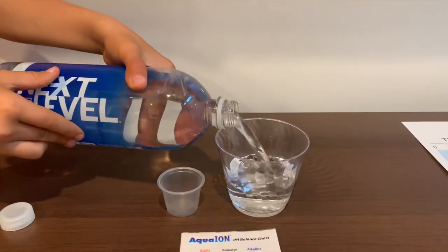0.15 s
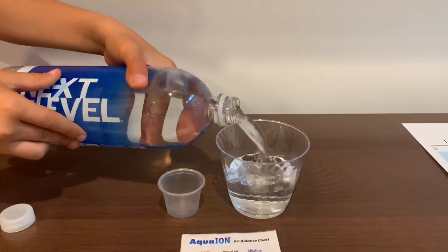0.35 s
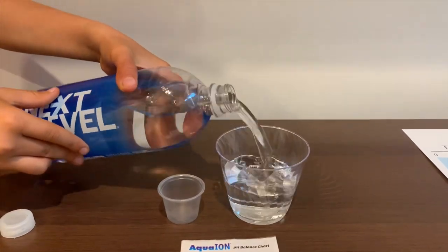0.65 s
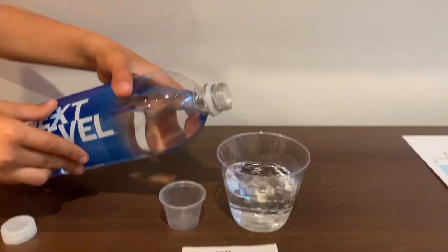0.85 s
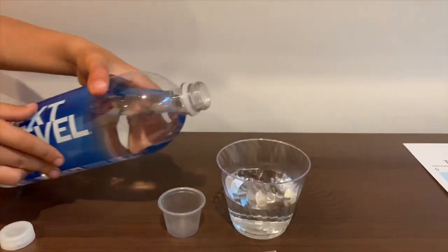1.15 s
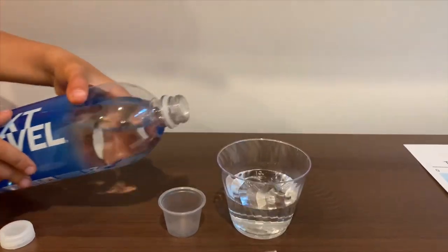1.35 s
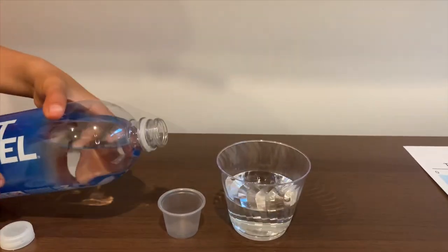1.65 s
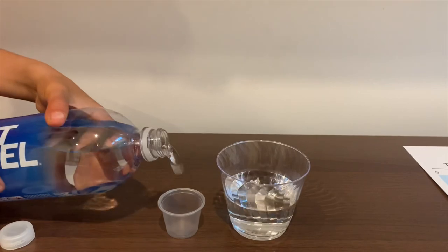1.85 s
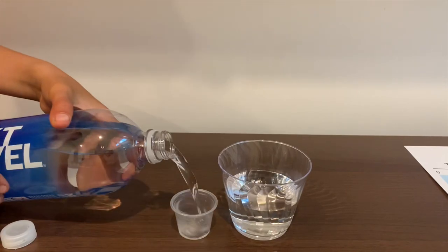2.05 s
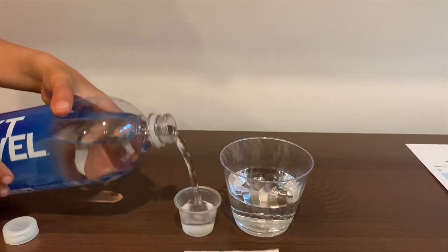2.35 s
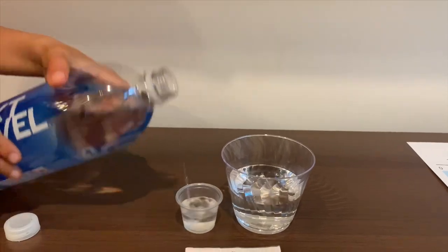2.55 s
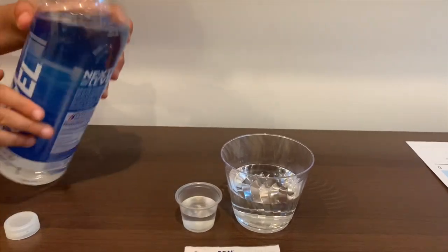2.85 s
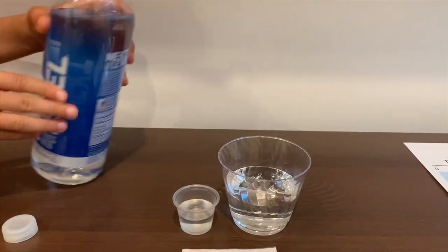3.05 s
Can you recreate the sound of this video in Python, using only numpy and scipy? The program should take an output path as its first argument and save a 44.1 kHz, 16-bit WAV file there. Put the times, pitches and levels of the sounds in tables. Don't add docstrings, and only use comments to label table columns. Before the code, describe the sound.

Water pours from a plastic bottle into plastic cups, bubbling and gulping, then the bottle thuds down

```python
import sys
import numpy as np
from scipy import signal
from scipy.fft import rfft, irfft, next_fast_len
from scipy.io import wavfile
from scipy.ndimage import uniform_filter1d

SR = 44100
rng = np.random.default_rng(int(sys.argv[2]) if len(sys.argv) > 2 else 0)


def master_out(mix):
    frames = np.transpose(np.atleast_2d(mix))
    ceiling = np.clip(frames, -1, 1)
    pcm = np.round(ceiling * 32767).astype(np.int16)
    wavfile.write(sys.argv[1], SR, pcm)


def makeup_ratio(level_db):
    decades = np.asarray(level_db, float) / 20
    return 10 ** decades


N = 141120

# [f/Hz, level/dB]
RUMBLE = [(41, -39), (80, -1.5), (174, -7.5), (216, -4), (588, -18.5), (1500, -35.5), (1950, -101),
          (3300, -120)]
# [f/Hz, level/dB]
HISS = [(1500, -4), (2700, -22.5), (4500, -18), (8800, -20.5), (10500, -22), (12200, -20.5), (14000, -22.5),
        (15300, -25)]
# [f/Hz, likeness 0 to 1]
LIKENESS = [(60, 0.78), (240, 0.78), (950, 0.19), (3770, 0.023), (6200, 0.12), (8500, 0.54), (9800, 0.98),
            (14000, .995)]
# [f/Hz, phase/rad]
LEFT_LEAD = [(1000, 0), (1700, -.9), (3100, 1.6), (5800, 2.8), (6600, .7), (10600, -3.14), (13600, -6.28),
             (16000, -8.6)]
# [f/Hz, level/dB]
LEFT_LEAN = [(250, -0.5), (800, 3.5), (2500, 5), (5000, -6), (9000, 1), (12000, 0.5)]
# [f/Hz, t60/s]
ROOM_DECAY = [(200, 0.38), (1000, 0.41), (3000, 0.44), (9000, 0.083)]
# [f/Hz, width/Hz, level/dB]
HUM_LINES = [(36.6, 6.5, -64.5), (54.7, 4.8, -52), (120.3, 2.9, -65.5), (168.94, 12.4, -48.5),
             (596.5, 15, -70), (861, 30, -77.5)]
# [t/s, knock level/dB, sway level/dB]
BUMPS = [
    (.896, -21.5, -29),
    (.941, -25.5, -34),
    (1.412, -23, -34.5),
    (1.459, -26, -30),
    (3.075, -10.5, -12),
    (3.0925, -20, -38),
    (3.141, -18, -38),
    (3.188, -14, -60),
]
# [f/Hz, level/dB, t60/s]
TABLE_TONES = [(92.6, -0.5, 0.21), (214.3, -0.5, 0.13), (362, 1.5, 0.099), (430, 9.5, 0.024),
               (437.5, -10.5, 0.095), (505.4, -3, 0.082), (650, -6, 0.092), (1010, -21.5, 0.16),
               (1050, -25.5, 0.048)]
# [t/s, peak level/dB, brightness/dB]
CRACKLES = [(0.034, -64.5, -2), (0.083, -69, 3), (0.1002, -59, -1), (0.1436, -60.5, -7), (0.2654, -61, 4),
            (0.3416, -64.5, -7), (1.0301, -67, 13), (1.053, -63, 6), (1.1214, -63, 4), (1.282, -63, 4),
            (1.55, -63.5, 1), (2.1774, -66, -2), (2.461, -70, 8), (2.9652, -62.5, 14), (0.3744, -47.5, 4),
            (0.598, -54, -3), (0.6459, -40, 2.5), (0.6649, -45, 18), (0.686, -39.5, 1.5), (0.8102, -53, 9),
            (0.8827, -47.5, 4.5), (1.0733, -58.5, 5), (1.162, -53.5, 2.5), (1.9955, -47.5, 4.5),
            (2.069, -49, 1.5), (2.2254, -57, 2.5), (2.5488, -43, 4.5), (2.6268, -42, 30),
            (3.0742, -43.5, -2), (3.1974, -46, 7)]
# [f/Hz, level/dB]
CRACKLE_COLOUR = [(2060, -27.5), (3500, -6), (5530, -1.5), (7130, -1.5), (8740, 1.5), (10600, 0),
                  (12500, -6.5), (16000, -4.5)]
# [t/s, peak level/dB, centre f/Hz, ring/s]
GULPS = [(0.178, -41, 760, 0.023), (.202, -30.5, 243, 0.028), (0.206, -28, 1147, 0.0073),
         (.343, -51, 600, .01), (0.3742, -32, 422, 0.036), (0.494, -36.5, 670, 0.11),
         (.65, -42.5, 333, 0.058), (0.687, -37, 344, 0.078), (1.996, -44.5, 650, 0.22),
         (2.551, -40.5, 415, 0.022), (2.603, -34.5, 467, 0.052), (2.623, -41, 920, 0.0091),
         (3.013, -57, 500, 0.022), (2.666, -43.5, 384, 0.18)]
# [f/Hz, width/Hz, level/dB]
BOTTLE_TONES = [(199, 38, 11), (309, 68, 5.5), (403, 35, -3.5), (650, 83, 0.5), (850, 33, -1),
                (1325, 33, -5), (1600, 64, -4), (1930, 59, -8), (2326, 69, -12.5)]
# [t/s, level/dB]
SPRAY_LEVEL = [(0, -74.5), (.15, -80.5), (.2, -89), (.62, -78), (.7, -68), (.9, -90), (1.2, -78.5),
               (1.4, -90), (1.98, -105), (2.0, -71), (2.08, -77), (2.12, -99), (2.22, -91), (2.24, -81),
               (2.3, -117), (2.55, -93), (2.7, -89), (3.2, -91)]
# [t/s, peak level/dB, centre f/Hz, length/s]
SPLASHES = [(1.99, -57.5, 12500, 0.034), (2.243, -67, 9000, 0.014), (2.638, -70, 12900, 0.028),
            (3.185, -55, 5270, 0.0088), (1.996, -61.5, 1490, 0.021), (2.602, -63, 3800, 0.05),
            (0.338, -54, 700, 0.0052), (.0, -61, 2920, 0.053), (0.357, -63, 1530, 0.0068),
            (0.374, -45.5, 1230, 0.011), (0.642, -57.5, 4300, 0.0063), (0.685, -47, 2370, 0.012),
            (0.882, -46.5, 2600, 0.0088), (1.992, -57, 1050, 0.066), (1.993, -46, 5340, 0.0042),
            (2.175, -62.5, 2420, 0.019), (2.234, -59.5, 3150, 0.014), (2.547, -46.5, 1120, 0.0079),
            (2.595, -49.5, 3160, 0.016), (2.599, -58, 1380, 0.013), (3.134, -60.5, 3950, 0.028)]
# [t/s, peak level/dB, f/Hz, cycles]
BUBBLES = [(0.0127, -57, 1930, 19), (0.0528, -55.5, 2190, 20), (0.0845, -47.5, 3560, 36),
           (0.105, -40, 2490, 3.7), (0.1533, -44, 3750, 13), (0.1575, -51, 1810, 7.9),
           (0.2094, -42.5, 1940, 22), (0.3891, -43.5, 3335, 33), (0.39, -42.5, 3720, 12),
           (0.4967, -33.5, 3145, 13.5), (0.496, -39.5, 3390, 5.5), (0.499, -40, 3020, 12),
           (0.499, -37.5, 1420, 3.3), (0.6906, -41.5, 1620, 11), (0.7456, -49, 1640, 31),
           (0.7735, -52, 2350, 13), (0.814, -51, 1900, 13), (0.8474, -36.5, 1910, 6.8),
           (0.862, -47, 1600, 11), (0.8721, -39.5, 2395, 19), (0.8855, -36.5, 1890, 7.8),
           (2.1783, -53, 2770, 8), (2.5157, -62, 3250, 12), (2.522, -59, 3000, 10),
           (2.572, -55.5, 2170, 27), (2.604, -43, 2780, 8)]
# [t/s, peak level/dB, f/Hz]
FIZZ = [(0.0476, -55.5, 6700), (0.125, -61, 7100), (0.1424, -67, 8360), (0.2723, -57.5, 8100),
        (0.5015, -46, 7540), (0.565, -51, 7340), (0.599, -51, 9000), (0.6658, -39.5, 7340),
        (0.6806, -56, 7500), (0.7615, -59.5, 6020), (0.837, -61, 6660), (1.053, -60, 6300),
        (1.122, -58, 8440), (1.1443, -61, 6360), (2.0725, -55, 6800), (2.533, -58, 7140),
        (2.55, -43.5, 7100), (2.809, -56.5, 8260)]
# [t/s, level/dB]
STREAM_LEVEL = [(0, -65.5), (.17, -60.5), (.3, -66.5), (.72, -64), (.9, -60), (1.05, -72.5), (1.95, -79.5),
                (2.049, -70), (2.621, -80.5), (2.8, -80.5), (3.2, -68)]

FILL_START_S, FILL_END_S = 2.26, 2.5
FIZZ_CYCLES = 20
ROOM_DB, BUMP_ROOM_DB = -8.5, -8


def evened(x):
    return x / np.sqrt(np.mean(x ** 2) + 1e-20)


def read(points, hz):
    f, value = np.transpose(points)
    return np.interp(np.log(hz + 1), np.log(f + 1), value)


def level_curve(points):
    s, db = np.transpose(points)
    return makeup_ratio(np.interp(np.arange(N) / SR, s, db))


def add(mix, s, sound):
    part = mix[max(round(s * SR), 0):][:len(sound)]
    part += sound[:len(part)]


def resonate(x, hz, width):
    turn = np.exp(2j * np.pi * np.cumsum(hz * np.ones(len(x))) / SR)
    r = np.exp(-np.pi * width / SR)
    return 2 * (turn * signal.lfilter([1 - r], [1, -r], x / turn)).real


def resonate_twice(x, hz, width, second_width):
    return resonate(resonate(x, hz, width), hz, second_width)


def noise_pair(shape, size, count):
    frames = count * 4 // size + 6
    hz = np.fft.rfftfreq(size, 1 / SR)[:, None]
    a, b, c, d = rng.standard_normal((frames, len(hz), 4)).T
    same = np.clip(read(LIKENESS, hz), -1, 1)
    left = a + 1j * b
    right = same * left + np.sqrt(1 - same ** 2) * (c + 1j * d)
    sides = np.array([1, -1])[:, None, None]
    z = np.array([left, right]) * np.exp(.5j * read(LEFT_LEAD, hz) * sides)
    z = z * shape(hz, np.arange(frames) * size / 4 / SR)
    return evened(signal.istft(z, nperseg=size, noverlap=size * 3 // 4)[1][:, :count])


def room_air():
    low = noise_pair(lambda hz, s: makeup_ratio(read(RUMBLE, hz) - 60 * (hz > 1500)), size=2048, count=N)
    high = noise_pair(lambda hz, s: makeup_ratio(read(HISS, hz) - 60 * ((hz <= 1500) | (hz > 15300))),
                      size=1024, count=N)
    return makeup_ratio(-54) * low + makeup_ratio(-78.5) * high


def hum():
    throb_per_s, dip_s, depth = 1.957, 0.27, 0.37
    t = np.arange(N) / SR
    throb = 1 - depth * np.cos(np.pi * throb_per_s * (t - dip_s)) ** 4
    out = np.zeros(N)
    for hz, width, db in HUM_LINES:
        wavering = resonate_twice(rng.standard_normal(N), hz, width, width)
        steady = 2.74 * np.sqrt(width / SR) * np.sin(2 * np.pi * hz * t)
        out += makeup_ratio(db) * (throb if hz < 80 else 1) * evened(wavering + steady)
    return out


def room(x):
    tail = noise_pair(lambda hz, s: makeup_ratio(-60 * s / read(ROOM_DECAY, hz)), size=256, count=SR // 2)
    tail = tail * np.clip(np.arange(SR // 2) / SR / 0.0015 - .4, 0, 1)
    return signal.fftconvolve(x[None], tail / np.linalg.norm(tail[0]), axes=1)[:, :N]


def ports(x):
    size = next_fast_len(N + 2048)
    hz = np.fft.rfftfreq(size, 1 / SR)
    half = makeup_ratio(read(LEFT_LEAN, hz) / 2) * np.exp(.5j * read(LEFT_LEAD, hz))
    return irfft(rfft(x, size) * np.array([half, 1 / half]), size)[:, :N]


def bump(db, sway_db):
    rattle_db, rattle_hz, rattle_s = -29.5, 950, 0.022
    sway_hz, sway_t60, sway_rise_s = 42, 0.45, .016
    t = np.arange(SR // 2) / SR
    knock = np.zeros(len(t))
    for f, d, t60 in TABLE_TONES:
        pitch = f * rng.uniform(0.88, 1.03)
        knock -= makeup_ratio(d - 60 * t / t60) * np.sin(2 * np.pi * pitch * t)
    rattle = evened(resonate_twice(rng.standard_normal(len(t)), rattle_hz, 820, 1600))
    rattle = rattle * np.exp(-t / rattle_s)
    knock = makeup_ratio(db) * (knock / abs(knock).max() + makeup_ratio(rattle_db) * rattle)
    knock = knock * np.minimum(t / .0015, 1)
    rise = 1 - np.exp(-(t / sway_rise_s) ** 2)
    sway = rise * makeup_ratio(sway_db - 60 * t / sway_t60) * np.sin(2 * np.pi * sway_hz * t + 1.1)
    return knock, sway


def crackle(db, bright_db):
    rise_s, length_s = 0.00048, 0.0056
    t, hz = np.arange(2048) / SR, np.fft.rfftfreq(2048, 1 / SR)
    colour = read(CRACKLE_COLOUR, hz) + bright_db * np.where(hz > 10500, 1, -1)
    burst = evened(irfft(rfft(rng.standard_normal(2048)) * makeup_ratio(colour)))
    return makeup_ratio(db) * burst * np.minimum(t / rise_s, 1) * np.exp(-t / length_s * 2)


def gulp(db, hz, ring):
    t = np.arange(4000) / SR
    sign = rng.choice([-1., 1.], 4000)
    puff = sign * ((rng.random(4000) < .008) | (t == 0)) * np.exp(-t / ring * 4)
    puff = uniform_filter1d(uniform_filter1d(puff, size=7), size=9)
    bend = rng.uniform(.94, 1.06)
    wall = sum(makeup_ratio(d) * resonate_twice(puff, f * bend, w, 3 * w) for f, w, d in BOTTLE_TONES)
    air = resonate_twice(puff, hz, 0.15 * hz, 0.15 * hz)
    sound = evened(air) + 1.63 * evened(wall)
    return makeup_ratio(db) * sound / abs(sound).max()


def filling():
    low_hz, high_hz = 640, 950
    u = np.linspace(0, 1, round((FILL_END_S - FILL_START_S) * SR))
    hz = low_hz + (high_hz - low_hz) * u
    ring = resonate_twice(rng.standard_normal(len(u)), hz, 140, 140)
    return makeup_ratio(-65.5) * np.sin(np.pi * u) * evened(ring)


def spray():
    drops_per_s, hz, width_hz = 2600, 6480, 5400
    drops = (rng.random(N) < drops_per_s / SR) * rng.standard_normal(N)
    drops = drops + 0.11 * rng.standard_normal(N)
    cloud = resonate_twice(drops, hz, width_hz, width_hz)
    return evened(cloud) * level_curve(SPRAY_LEVEL)


def splash(db, hz, length):
    t = np.arange(8000) / SR
    drops = rng.standard_normal(8000) * (.2 + 3 * (rng.random(8000) < .015))
    cloud = evened(resonate_twice(drops, hz, 0.86 * hz, 0.86 * hz))
    return makeup_ratio(db) * cloud * np.minimum(t / 0.0015, 1) * np.exp(-t / length)


def bubble(db, hz, cycles):
    ring, glide, roughness_rad = .6, .008, .65
    u = np.arange(round(3 * cycles * SR / hz)) * hz / SR / cycles
    shape = (1 - np.exp(-(u / 0.084) ** 2)) * np.exp(-u / ring)
    smooth = round(4 * SR / hz)
    wobble = uniform_filter1d(uniform_filter1d(rng.standard_normal(4096), smooth), smooth)
    wobble = roughness_rad * evened(wobble)[:len(u)]
    tone = np.sin(2 * np.pi * cycles * u * (1 + glide * (u - .5)) + wobble)
    return makeup_ratio(db) * shape / shape.max() * tone


def trickle():
    bubbles_per_s, spread_db, tilt_db, cycles = 1100, 3.2, -0.5, 7
    strength = makeup_ratio(spread_db * np.minimum(rng.exponential(1, N), 4))
    hit = (rng.random(N) < bubbles_per_s / SR) * strength
    kind, out = rng.integers(0, 30, N), np.zeros(N)
    for k, hz in enumerate(np.geomspace(492, 4300, 30)):
        one = bubble(tilt_db * np.log2(hz / 2000), hz, cycles)
        out += signal.oaconvolve(hit * (kind == k), one)[:N]
    return evened(out) * level_curve(STREAM_LEVEL)


def scene():
    near, knocks, sways = trickle() + spray(), np.zeros(N), np.zeros(N)
    add(near, FILL_START_S, filling())
    for s, *row in BUBBLES:
        add(near, s, bubble(*row))
    for s, *row in SPLASHES:
        add(near, s, splash(*row))
    for s, db, hz in FIZZ:
        add(near, s, bubble(db, hz, FIZZ_CYCLES))
    for s, *row in CRACKLES:
        add(near, s, crackle(*row))
    for s, *row in GULPS:
        add(near, s, gulp(*row))
    for s, *row in BUMPS:
        knock, sway = bump(*row)
        add(knocks, s, knock)
        add(sways, s, sway)
    wet = room(makeup_ratio(ROOM_DB) * near + makeup_ratio(BUMP_ROOM_DB) * knocks)
    return ports(near) + knocks + wet + sways + hum() + room_air()


def roll_off(x):
    return signal.sosfilt(signal.butter(12, 16490, fs=SR, output="sos"), x)


def record(dry):
    edge = signal.firwin(255, 15900, fs=SR)
    mix = signal.oaconvolve(dry, edge[None], "same")
    return roll_off(mix)


dry = scene()
out = record(dry)
master_out(out)
```